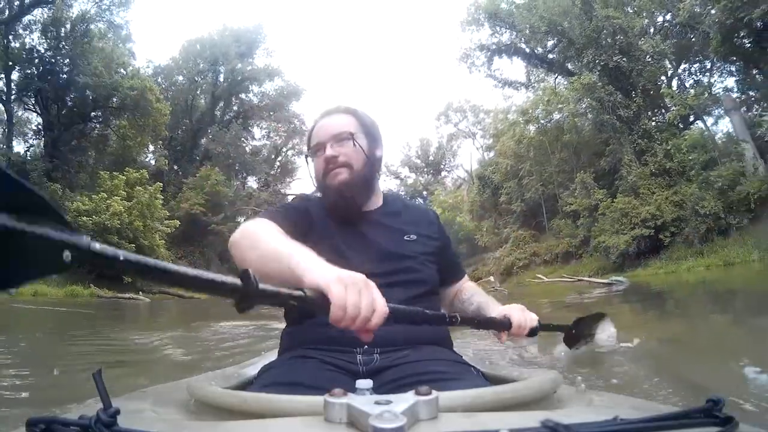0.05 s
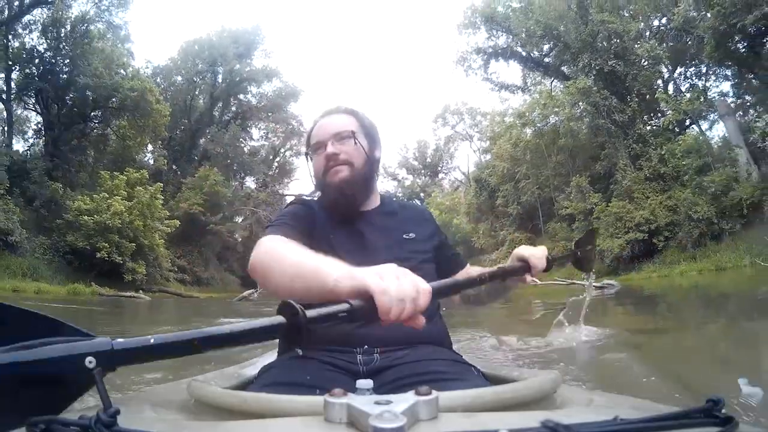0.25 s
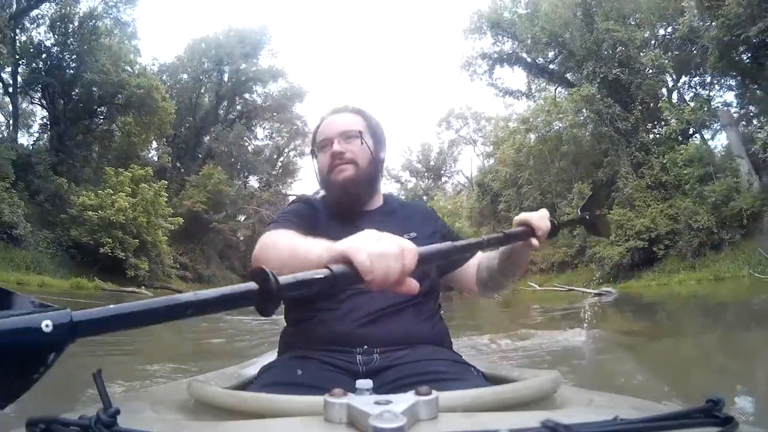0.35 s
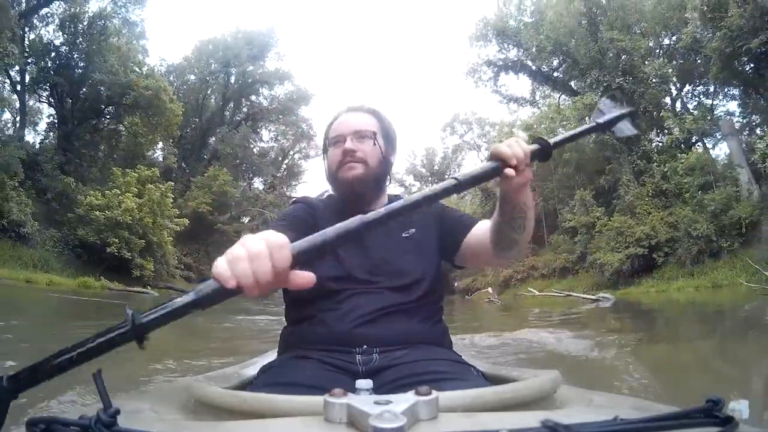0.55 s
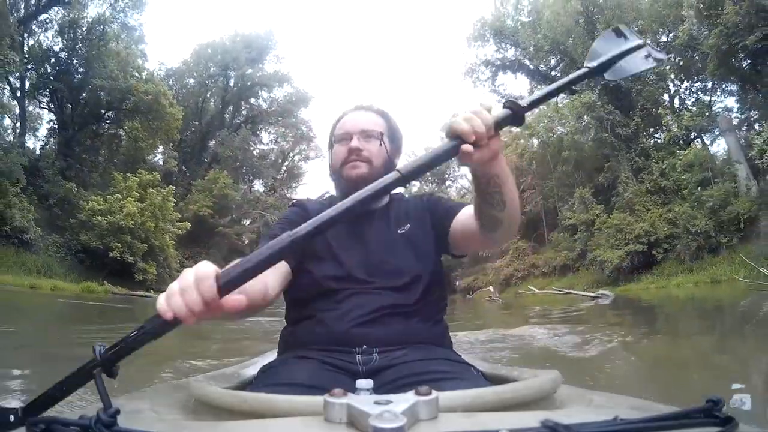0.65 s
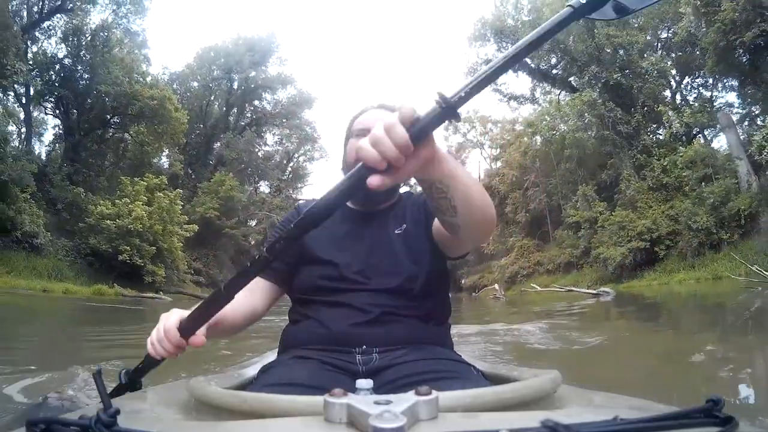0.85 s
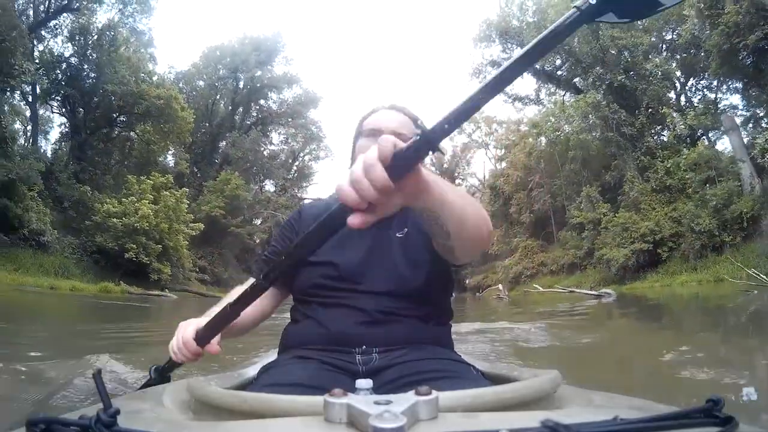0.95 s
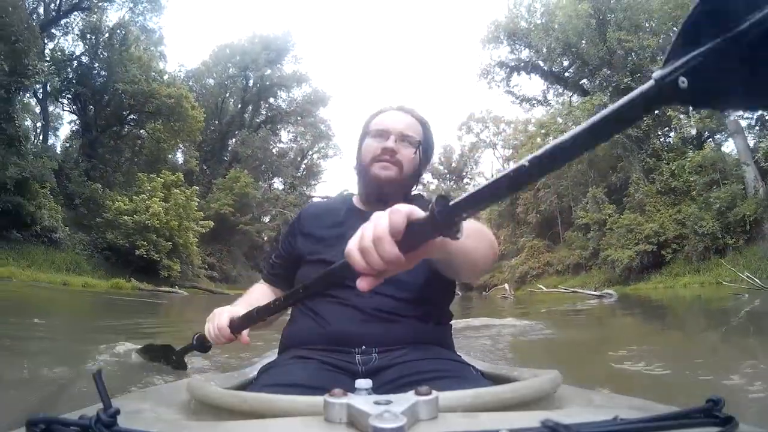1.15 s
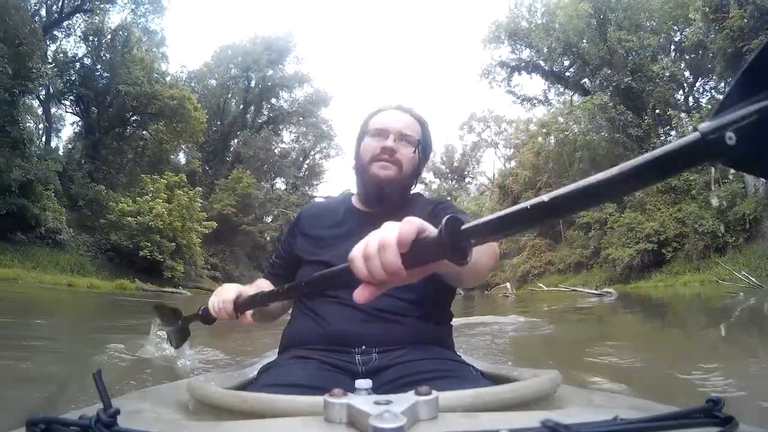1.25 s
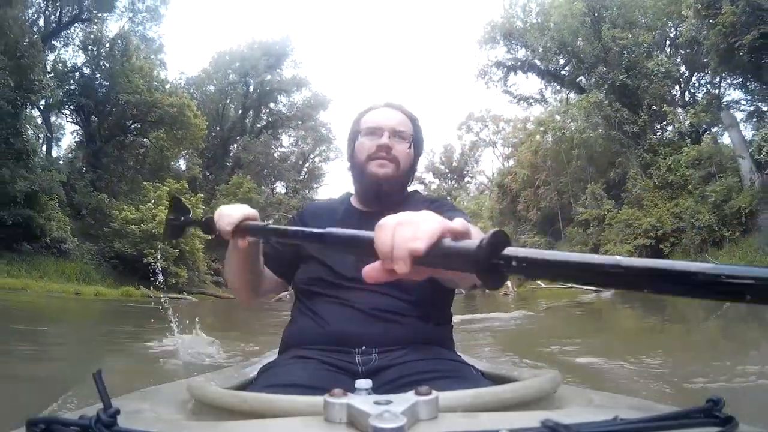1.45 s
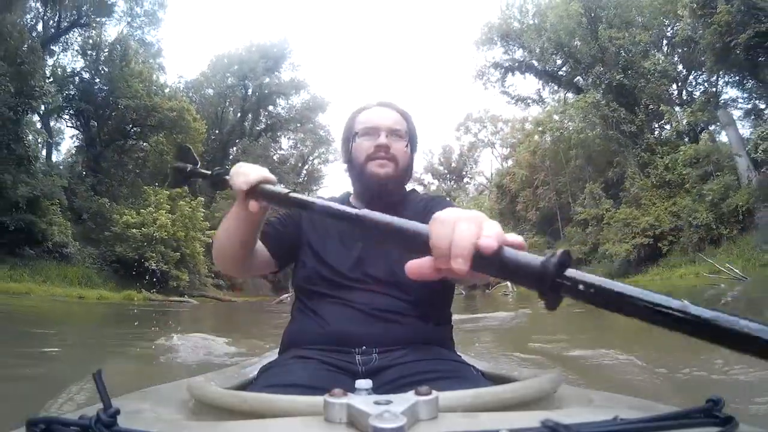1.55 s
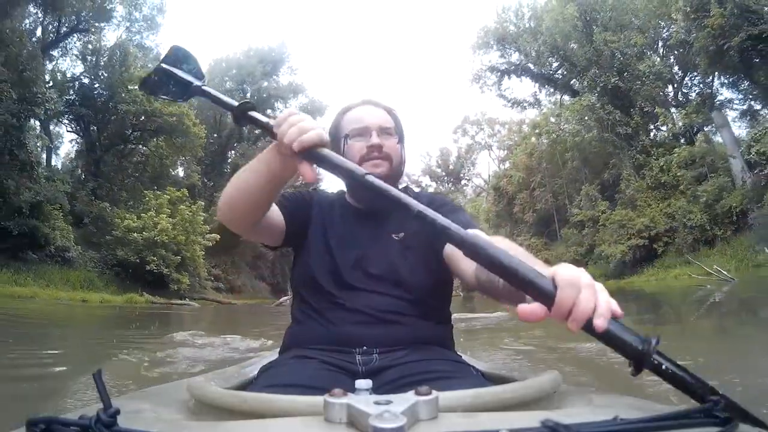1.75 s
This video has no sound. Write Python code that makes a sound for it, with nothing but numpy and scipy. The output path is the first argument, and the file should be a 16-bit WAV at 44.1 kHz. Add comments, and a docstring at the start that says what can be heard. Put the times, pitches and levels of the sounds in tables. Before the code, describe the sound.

At about 0.2 seconds a sharp, deep knock hits a plastic kayak, heard close from its deck. It clacks with a very quick rebound, and the hollow hull booms, fading by about 0.8 seconds. A faint double bump follows near 1.2 seconds. Throughout, small paddle drips plink softly over the quiet, low wash of a calm river and a thin microphone hiss.

```python
"""One deep knock on a plastic kayak, heard from its deck while paddling on a calm river.
The blow clacks and rebounds three times; the hollow hull booms on in low modes that beat together.
A faint double bump follows a second later. Paddle drips plink over the quiet wash of the river and a
thin microphone hiss. A noise suppressor opens briefly on the knock, lifting its tail and the hiss."""
import sys
import numpy as np
from scipy import signal
from scipy.fft import rfft, irfft
from scipy.io import wavfile
from scipy.ndimage import uniform_filter1d

SR = 44100
rng = np.random.default_rng(int(sys.argv[2]) if len(sys.argv) > 2 else 0)


def inscribe(sig):
    """Save sig as 16-bit PCM at rate SR to the path in sys.argv[1].

    A 1-D sig is mono; a 2-D sig holds one channel per row.
    Samples are clipped to [-1, 1] before scaling.
    """
    pcm = np.round(np.clip(np.atleast_2d(sig).T, -1, 1) * 32767)
    wavfile.write(sys.argv[1], SR, pcm.astype(np.int16))


N = 79380
T = np.arange(N) / SR
HZ = np.fft.rfftfreq(N, 1 / SR)


def amp(db):
    """Decibels to gain."""
    return 10 ** (np.asarray(db) / 20)


def eq_curve(points):
    """Gain at every frequency from (freq_hz, level_db) points."""
    hz, db = np.transpose(points)
    return amp(np.interp(np.log(HZ + 1), np.log(hz), db))


def noise(spectrum):
    """Noise of rms 1, coloured by the given spectrum."""
    x = irfft(rfft(rng.standard_normal(N)) * spectrum, N)
    return x / np.sqrt(np.mean(x ** 2) + 1e-20)


def split_bands(x, crossover_hz):
    """Soft crossover: returns the lows and the highs."""
    lows = irfft(rfft(x) / (1 + (HZ / crossover_hz) ** 4), N)
    return lows, x - lows


def add(mix, start_s, sound):
    """Mixes a sound in at its start time."""
    part = mix[max(round(start_s * SR), 0):]
    part += sound[:len(part)]


def ring(t60_s, attack_s):
    """Envelope that builds up and dies away."""
    return (1 - np.exp(-T / attack_s)) * np.exp(-np.log(1000) * T / t60_s)


def hull_knocks():
    """Each blow rings the same hull modes; neighbouring modes push the deck in opposite directions."""
    # blows on the hull: start_s, boom_db, panel_db, clack_db
    blows = [(0.2162, -1, -2.5, -1), (0.2372, -5.5, -28, -18), (.258, -14, -13, -11.5),
             (0.2699, -48, -15, -25), (1.2304, -52, -31.5, -34), (1.2355, -55, -26, -35)]
    # modes of the hollow hull: pitch_hz, level_db, t60_s
    hull_modes = [(30.2, -33.5, 0.12), (46.8, -30.5, 0.6), (66.87, -21.5, 0.79), (91.4, -22, 0.09),
                  (118.7, -36.5, 0.35), (134.3, -35, 0.34), (187.5, -41.5, .2), (212.5, -44.5, 0.34),
                  (250, -30.5, 0.073), (284.5, -34, .19), (350.4, -25.5, .03), (496, -8, 0.024),
                  (522, -36, 0.14), (550.7, -38.5, 0.27), (729, -44, 0.1), (963, -38, 0.07)]
    # short-lived modes of the struck spot: pitch_hz, level_db, t60_s
    clack_modes = [(1231, -36, 0.034), (1423, -28, 0.028), (1522, -15.5, 0.014), (1655, -27, 0.027),
                   (1831, -26.5, 0.019), (2140, -49.5, 0.031), (2440, -35, 0.018)]
    boom_below_hz, detune = 200, 0.017
    boom, panel, clack, out = np.zeros((4, N))
    for k, (pitch_hz, level_db, t60_s) in enumerate(hull_modes):
        mode = -(-1) ** k * amp(level_db) * np.cos(2 * np.pi * pitch_hz * T)
        if pitch_hz < boom_below_hz:
            beating = np.cos(np.pi * detune * pitch_hz * T)  # the hull's two sides are tuned apart
            boom += mode * beating * ring(t60_s, attack_s=0.0013)
        else:
            panel += mode * ring(t60_s, attack_s=0.0051)
    for k, (pitch_hz, level_db, t60_s) in enumerate(clack_modes):
        mode = (-1) ** k * amp(level_db) * np.sin(2 * np.pi * pitch_hz * T)
        clack += mode * ring(t60_s, attack_s=0.0025)
    for start_s, boom_db, panel_db, clack_db in blows:
        tones = amp(boom_db) * boom + amp(panel_db) * panel + amp(clack_db) * clack
        shudder = amp((panel_db + clack_db) / 2) * wall_shudder()
        add(out, start_s, tones + shudder)
    return out


def wall_shudder():
    """Dense vibration of the plastic wall fills in between the modes; its treble dies first."""
    # colour of the wall's vibration: freq_hz, level_db
    wall_eq = [(100, -4), (380, -3), (520, -4), (700, -9), (1100, -12.5), (1550, 0), (2300, -16.5),
               (2900, -27), (4200, -28), (6500, -40), (15000, -63)]
    lows, highs = split_bands(noise(eq_curve(wall_eq)), crossover_hz=900)
    body = lows * ring(t60_s=0.1, attack_s=0.0008)
    snap = highs * ring(t60_s=0.022, attack_s=0.0008)
    return amp(-27.5) * (body + snap)


def paddle_drips():
    """Each drip is a small, slightly rising bubble tone with a puff of spray around its pitch."""
    # drips and small splashes off the paddle: start_s, pitch_hz, level_db, t60_s
    drips = [(0.013, 1540, -56, 0.026), (0.032, 504, -55, 0.053), (.094, 513, -47, 0.042),
             (0.16, 893, -61.5, .09), (0.608, 4417, -59, 0.023), (0.6173, 2390, -53, 0.019),
             (0.696, 1410, -59.5, 0.032), (1.022, 1900, -53.5, 0.017), (1.0474, 3850, -48, 0.0098),
             (1.378, 488, -60.5, 0.15), (1.646, 1410, -55, 0.031)]
    glide_per_s, spray_width = 1, 0.086  # both as shares of the pitch
    out = np.zeros(N)
    for start_s, pitch_hz, level_db, t60_s in drips:
        bubble = np.sin(2 * np.pi * pitch_hz * (T + glide_per_s * T ** 2 / 2))
        spray = noise(1 / (1 + ((HZ / pitch_hz - 1) / spray_width) ** 2))
        envelope = amp(level_db) * ring(t60_s, attack_s=0.0011)
        add(out, start_s, envelope * (bubble + 0.8 * spray))
    return out


def river_wash():
    """Low wash of water along the hull, lapping unevenly."""
    # colour of the wash: freq_hz, level_db
    wash_eq = [(15, 1.5), (35, 4), (70, 2), (160, -2.5), (300, -5), (500, -8.5), (800, -15), (1500, -16.5),
               (2600, -23.5), (6000, -35.5), (15000, -30)]
    # swell and ebb of the wash: time_s, level_db
    wash_levels = [(0, -62.5), (.2, -62.5), (.45, -61.5), (.7, -64), (.92, -66), (1.15, -64), (1.3, -62),
                   (1.48, -63.5), (1.8, -64)]
    lap_depth_db, lap_below_hz = 1, 19
    lapping_db = lap_depth_db * noise(1 / (1 + (HZ / lap_below_hz) ** 4))
    swell_db = np.interp(T, *np.transpose(wash_levels))
    return noise(eq_curve(wash_eq)) * amp(swell_db + lapping_db)


def microphone_hiss():
    """Even microphone hiss with a faint high whine that swells just after the knock."""
    # colour of the hiss: freq_hz, level_db
    hiss_eq = [(100, 10.5), (2000, 0), (4000, -0.5), (7000, -1), (12000, -2), (14500, -3.5), (15700, -8.5)]
    # rise and fall of the whine: time_s, level_db
    whine_levels = [(.2, -92), (.45, -81), (.66, -96), (1.8, -87)]
    whine_hz, whine_width_hz = 9550, 75
    whine = noise(1 / (1 + ((HZ - whine_hz) / whine_width_hz) ** 2))
    whine_db = np.interp(T, *np.transpose(whine_levels))
    hiss = noise(eq_curve(hiss_eq)) * amp(-69.5)
    return hiss + whine * amp(whine_db)


def noise_suppressor(x):
    """Eases open while the sound is loud, lifting the lows more than the highs, then closes again."""
    threshold_db, memory_s = -43, 0.25
    low_lift_db, high_lift_db = 8, 4.5  # when fully open
    power = abs(uniform_filter1d(x ** 2, size=2200))  # 50 ms average
    is_loud = 10 * np.log10(power + 1e-12) > threshold_db
    loud_s = np.cumsum(is_loud) / SR
    openness = (loud_s - np.interp(T - memory_s, T, loud_s)) / memory_s  # loud share of the recent past
    lows, highs = split_bands(x, crossover_hz=2550)
    return lows * amp(low_lift_db * openness) + highs * amp(high_lift_db * openness)


def scene():
    """Hull, water and hiss in mono."""
    return (hull_knocks() + paddle_drips() + river_wash() + microphone_hiss())[None]


def record(dry):
    """The mix passes through the noise suppressor, then a steep high cut."""
    high_cut_hz = 15750
    high_cut = signal.firwin(511, high_cut_hz, window=("kaiser", 9), fs=SR)
    return signal.oaconvolve(noise_suppressor(dry[0]), high_cut, "same")[None]


dry = scene()
out = record(dry)
inscribe(out)
```